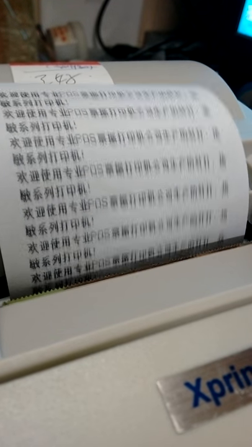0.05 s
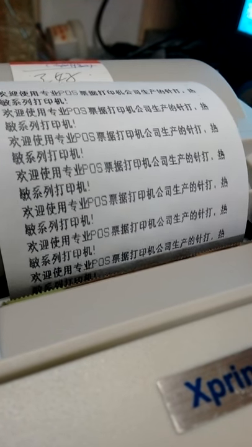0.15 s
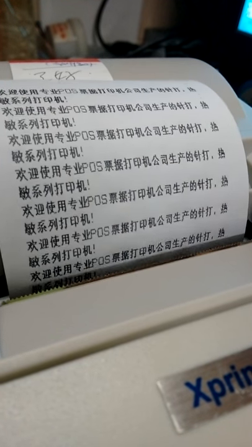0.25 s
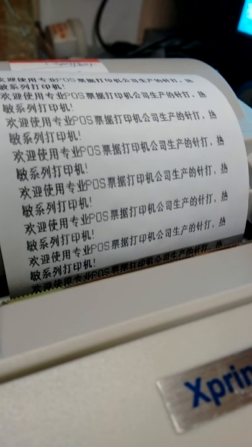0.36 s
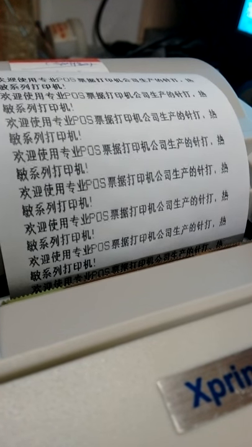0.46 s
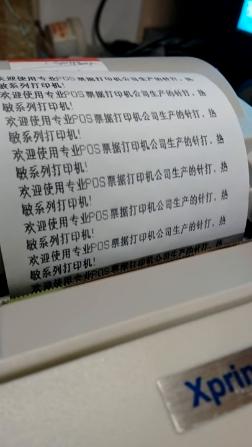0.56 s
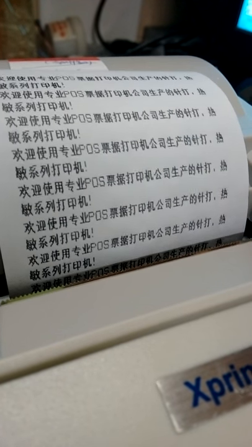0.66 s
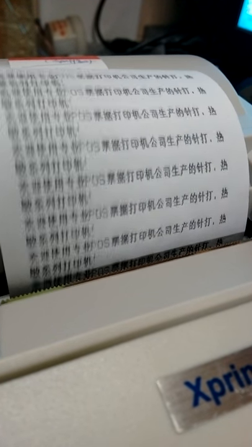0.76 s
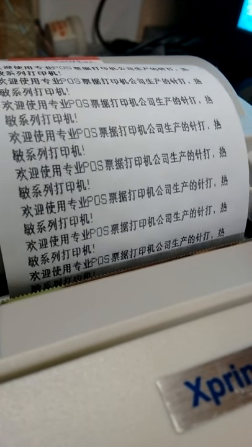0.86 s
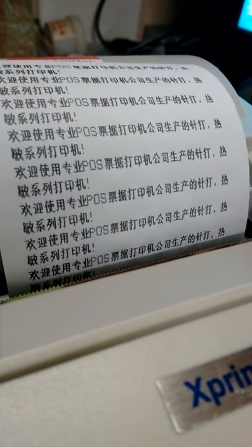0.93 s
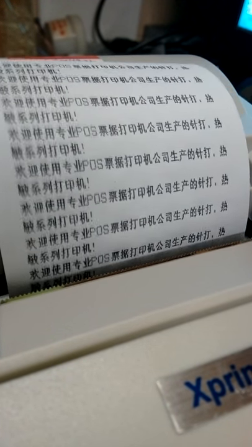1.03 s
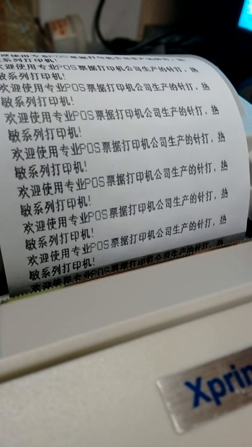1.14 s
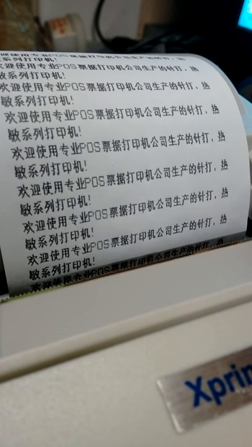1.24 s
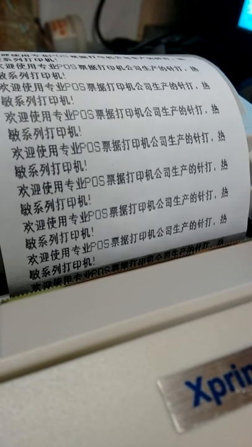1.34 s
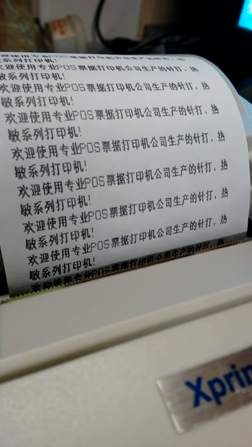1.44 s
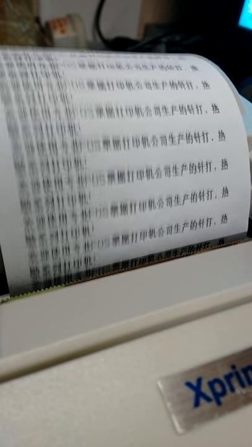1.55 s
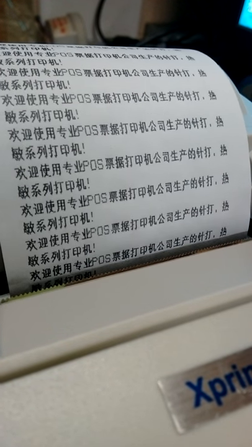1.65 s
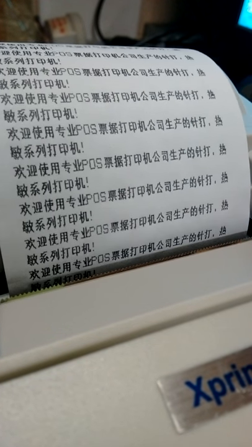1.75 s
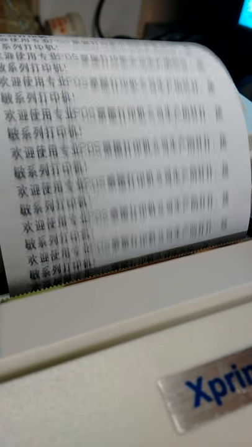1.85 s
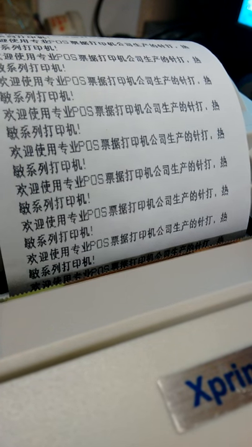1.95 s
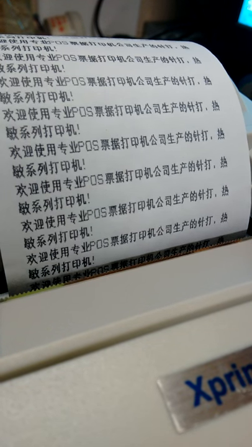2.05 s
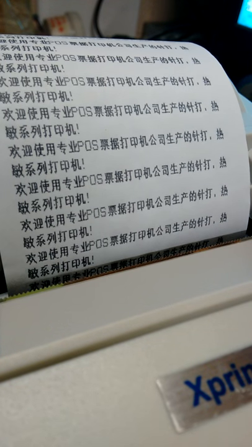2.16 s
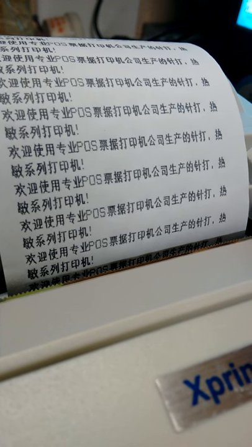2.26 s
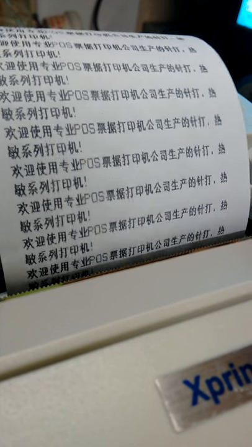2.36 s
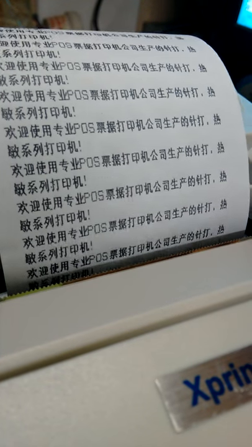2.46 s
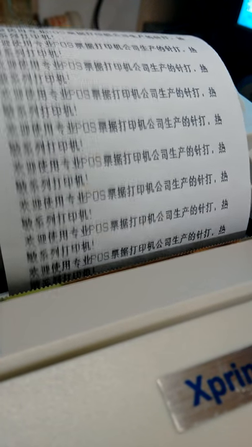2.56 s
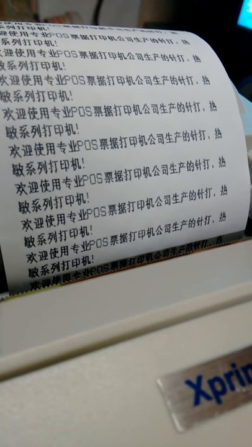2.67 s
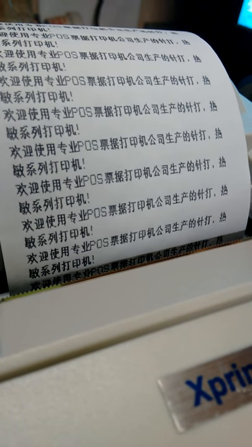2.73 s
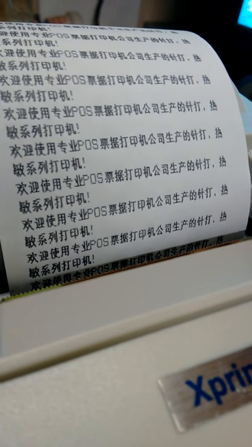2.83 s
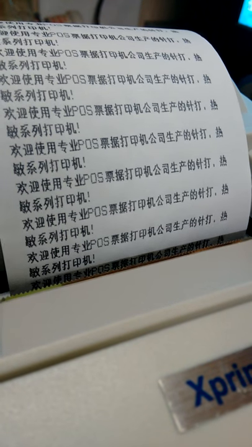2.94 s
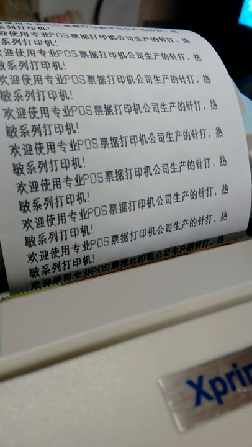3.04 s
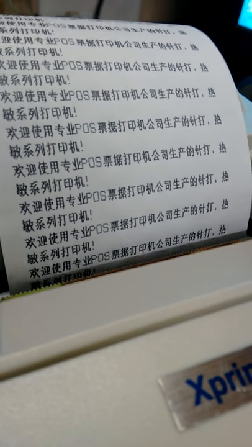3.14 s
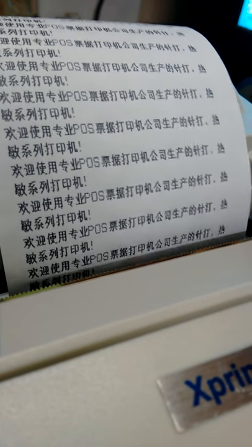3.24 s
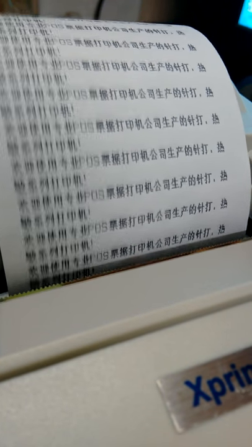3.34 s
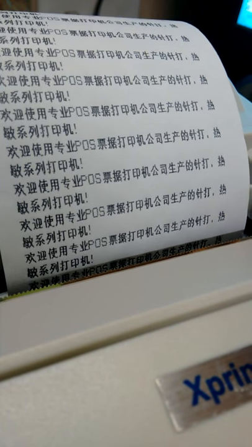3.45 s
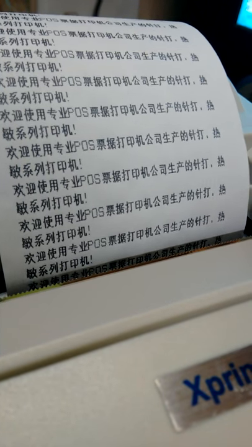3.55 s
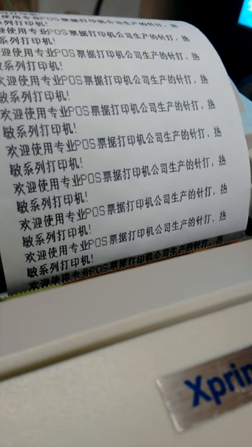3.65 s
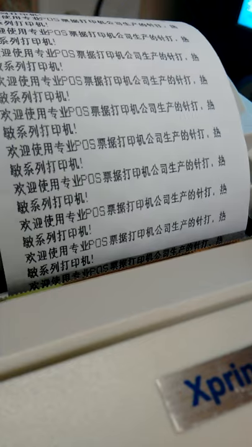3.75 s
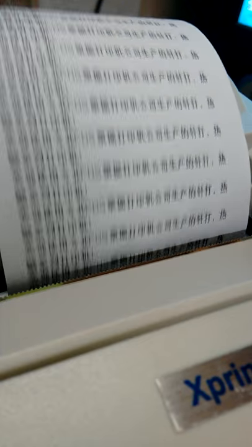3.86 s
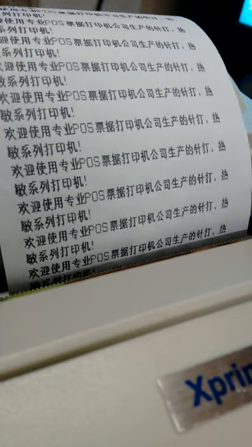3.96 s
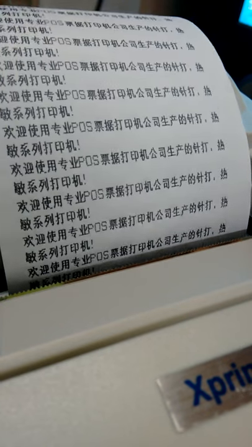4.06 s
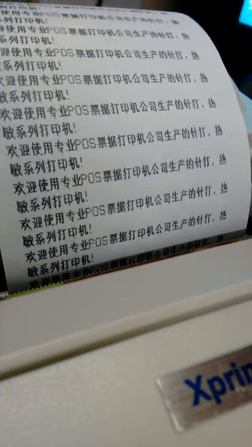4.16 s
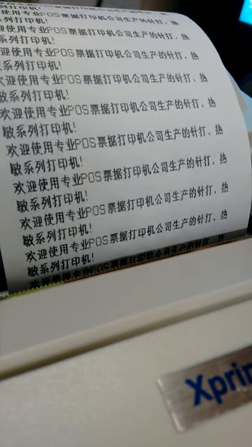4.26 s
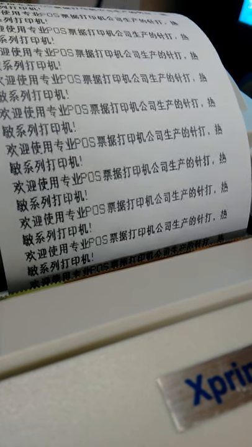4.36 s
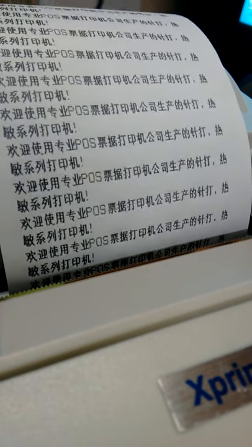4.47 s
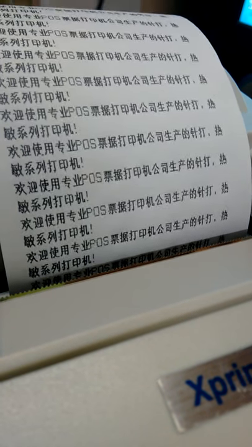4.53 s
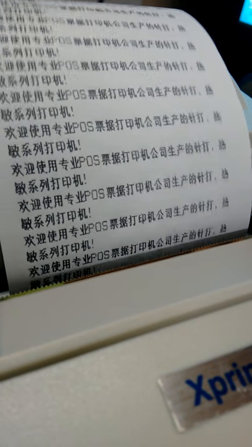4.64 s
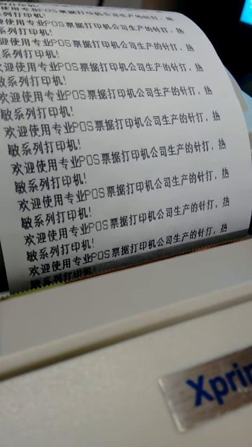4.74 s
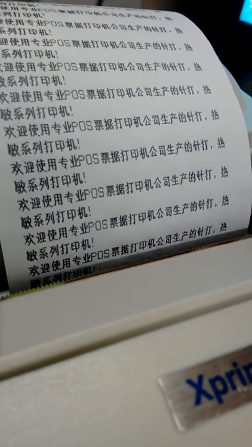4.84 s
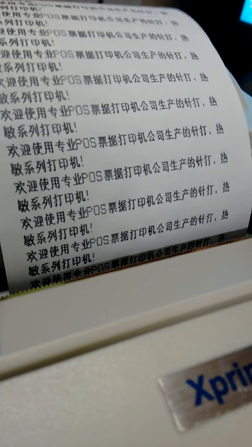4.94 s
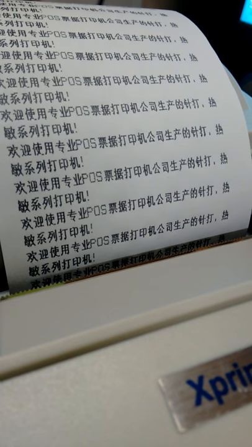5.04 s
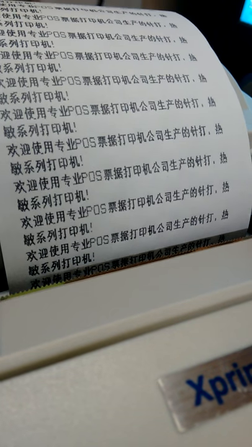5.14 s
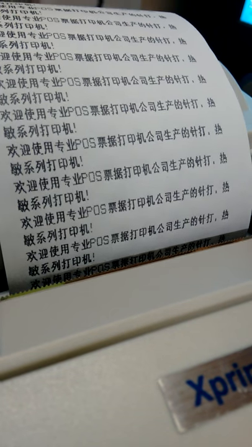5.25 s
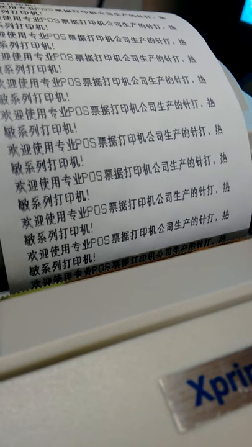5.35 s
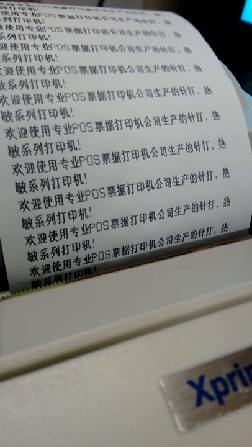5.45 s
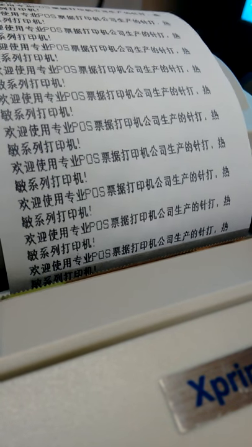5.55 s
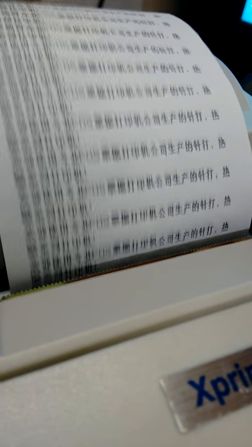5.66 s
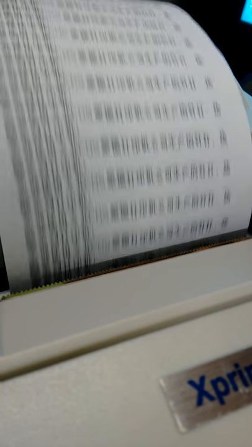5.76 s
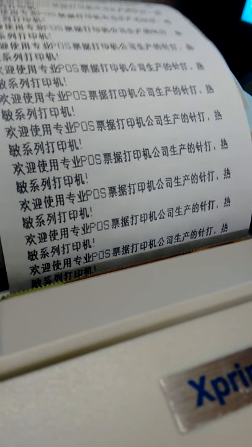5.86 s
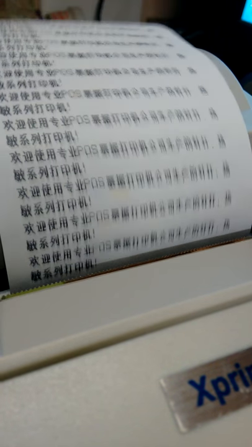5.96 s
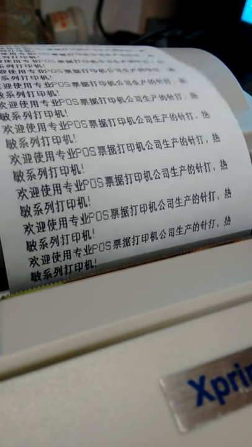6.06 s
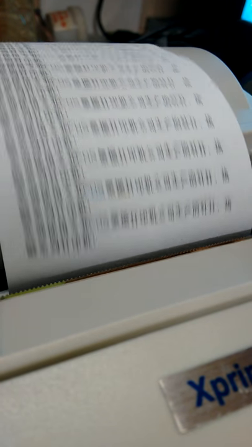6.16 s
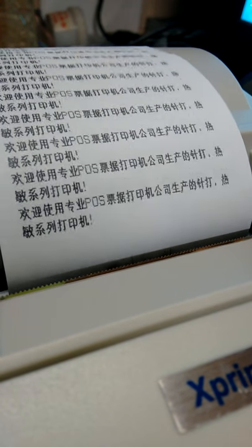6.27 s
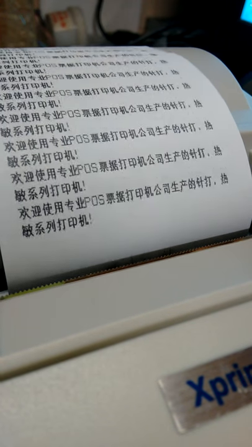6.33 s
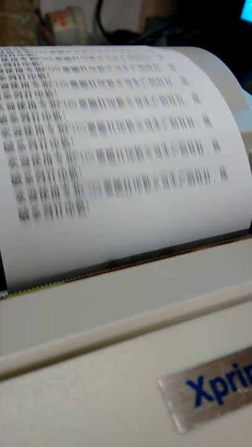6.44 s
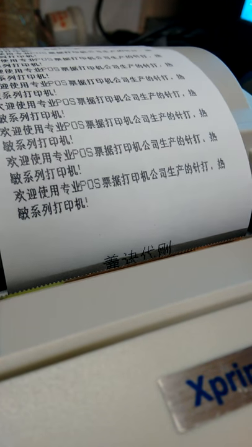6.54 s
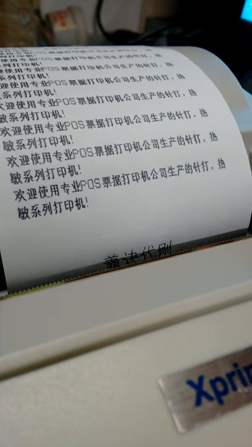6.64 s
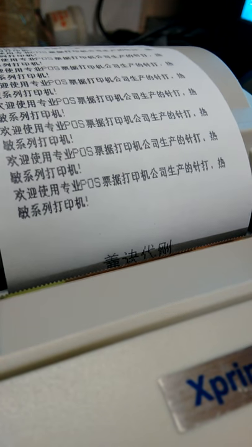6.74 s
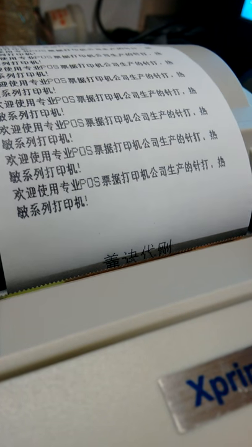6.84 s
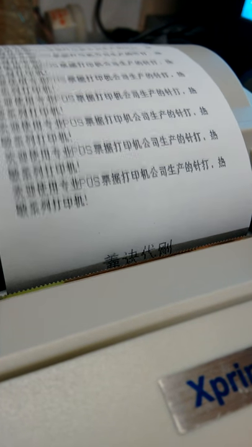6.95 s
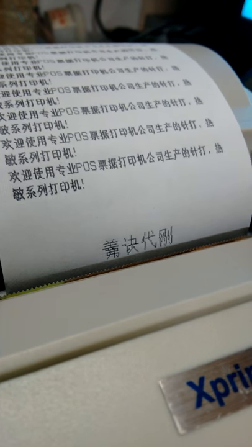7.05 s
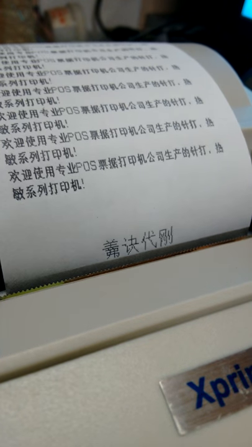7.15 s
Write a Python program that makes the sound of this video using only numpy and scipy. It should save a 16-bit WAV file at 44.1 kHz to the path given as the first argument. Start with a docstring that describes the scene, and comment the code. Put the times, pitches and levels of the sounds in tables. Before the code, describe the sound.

A small impact printer buzzes and zips rapidly line after line, clattering as its carriage reverses, then pauses and finishes with sparse short rasps.

```python
"""A dot-matrix receipt printer, very close: it prints the same two lines of text over and over, then a footer.
Eight pins strike on a fixed column clock, two passes a line; their blows ring and add up to clock tones.
Gear teeth jolt case and loose parts as paper and carriage move, stepper motors sing at their step rate,
and the running mechanism chatters. The pins are louder on the right; the input stage flattens the peaks."""
import sys
import numpy as np
from scipy import signal
from scipy.fft import rfft, irfft, next_fast_len
from scipy.io import wavfile
from scipy.ndimage import uniform_filter1d

SR = 44100
rng = np.random.default_rng(int(sys.argv[2]) if len(sys.argv) > 2 else 0)


def log_audio(samples):
    """Write samples as a 16-bit WAV file to the path given in sys.argv[1]."""
    # one column per channel
    frames = np.atleast_2d(samples).T
    # limit to full scale, then quantise
    limited = np.clip(frames, -1, 1)
    pcm = np.round(limited * 32767).astype(np.int16)
    wavfile.write(sys.argv[1], SR, pcm)


N = 317500
FREQ = np.fft.rfftfreq(next_fast_len(N + SR // 2), 1 / SR)
TIME = np.arange(N) / SR

COLUMN_HZ = 2368.6
LAG_S = .00027  # the left microphone hears later
BRAKE_AFTER_S, RUN_UP_S = .014, .021  # carriage brakes after the last dot, sets off before the next

# starts of the repeats of the two text lines: time [s]
REPEAT_STARTS = [-.2377, .526, 1.2897, 2.0533, 2.817, 3.5806, 4.3443, 5.1079]
# print runs in one repeat: (start [s], end [s], head place at start [0-1], direction [+1/-1],
# columns per dot, level [dB])
TEXT_RUNS = [(0, .0455, 0, 1, 1, -.5), (.0603, .153, .36, 1, 1, 1), (.159, .1662, .95, 1, 1, -1),
             (.2298, .2372, 1, -1, 1, 1), (.244, .396, .91, -1, 1, 0), (.4855, .531, 0, 1, 1, 0),
             (.6022, .649, .27, -1, 1, -.5)]
# print runs in the footer, same columns
FOOTER_RUNS = [(6.0407, 6.101, 0.2, 1, 2, 1), (6.188, 6.246, 0.62, -1, 2, .5),
               (6.435, 6.46, 0.28, 1, 1, 0.5), (6.534, 6.568, 0.3, -1, 1, 0),
               (6.78, 6.784, 0.11, 1, 1, -10), (6.795, 6.8, 0.26, 1, 1, -1.5),
               (6.809, 6.826, 0.25, 1, 1, -2), (7.022, 7.064, 0.33, -1, 1, -1),
               (7.071, 7.076, 0.11, -1, 1, -6), (7.087, 7.092, .06, -1, 1, -6)]
# carriage travel without printing: (start [s], end [s], level [dB])
CARRIAGE_TRAVELS = [(5.968, 6.007, -6.5), (6.641, 6.69, -6), (6.694, 6.793, -1.5), (6.863, 6.987, -1.5)]
# print head balance: (frequency [Hz], left minus right [dB])
HEAD_BALANCE = [(100, -13), (1000, -5), (2700, -4), (3800, -6.5), (5300, -11), (6000, -1), (7200, -16.5),
                (8400, -19.5), (9600, -24), (11000, -5), (12500, -2), (15000, -3.5)]
# drive balance, same columns
DRIVE_BALANCE = [(60, -5.5), (150, 3.5), (380, -1), (950, -2), (2380, -2.5), (5980, -10.5), (15000, 4)]


def amp(db):
    """Decibels to gain."""
    return 10 ** (np.asarray(db) / 20)


def unit(x):
    """Scale to rms 1."""
    return x / np.sqrt(np.mean(x ** 2) + 1e-20)


def along(points, hz):
    """(Hz, value) points read on a log axis."""
    f, v = np.transpose(points)
    return np.interp(np.log(hz + 1), np.log(f + 1), v)


def filtered(x, response):
    """x times a response given on FREQ."""
    size = next_fast_len(N + SR // 2)
    return irfft(rfft(x, size) * response, size)[..., :N]


def resonances(modes):
    """Causal response of (Hz, width Hz, dB) modes."""
    return sum(amp(db) * 1j * FREQ * w / (hz * hz - FREQ ** 2 + 1j * FREQ * w) for hz, w, db in modes)


def ring(shape, t60, tail_db, tail_t60):
    """Dense modes after a blow: a quick decay and a weaker, longer one from the housing (t60s in s)."""
    t = TIME[:SR // 12]
    decay = amp(-60 * t / t60) + amp(tail_db - 60 * t / tail_t60)
    return rng.standard_normal((*shape, len(t))) * decay


def add(track, s, sound):
    """Mix a sound into a track at s seconds."""
    i = int(round(s * SR))
    a, b = max(i, 0), min(i + sound.shape[-1], N)
    if b > a:
        track[..., a:b] += sound[..., a - i:b - i]


def at_ears(pair, spectrum, side, lag_s):
    """Colour two unrelated signals causally and share them between the microphones; the left hears later."""
    # (frequency [Hz], share common to both microphones [0-1])
    common_share = [(40, 0.8), (250, 0.99), (800, 1), (2000, 0.11), (6000, 0.06), (14000, 0.057)]
    size = next_fast_len(N + SR // 2)
    lean = amp(along(side, FREQ))
    gain = amp(along(spectrum, FREQ)) * np.array([lean, np.ones_like(lean)])
    # folded cepstrum: minimum phase
    cepstrum = irfft(np.log(gain), size)
    cepstrum[:, 1:size // 2] *= 2
    cepstrum[:, size // 2 + 1:] = 0
    own, common = rfft(pair, size)
    share = np.clip(along(common_share, FREQ), 0, 1)
    left = share * common + np.sqrt(1 - share ** 2) * own
    left = left * np.exp(-2j * np.pi * FREQ * lag_s)
    return unit(irfft(np.array([left, common]) * np.exp(rfft(cepstrum)), size)[:, :N])


def print_head(pin_db=-10.5, housing_db=-24, tone_db=0, force_db=3.0, scatter_s=.000008, places=5):
    """Pins strike on the column clock; each rings in its own way, which shifts as the head travels."""
    # pin strike spectrum: (frequency [Hz], level [dB per Hz])
    pin_spectrum = [(85, -53), (135, -22.5), (190, -35), (330, -28.5), (750, -37.5), (1000, -16.5),
                    (1300, -24), (1600, -24), (2700, -22.5), (4100, -19), (6300, -13), (8000, 2.5),
                    (9100, 2.5), (10600, -9.5), (15000, -14)]
    # platen and housing resonances: (frequency [Hz], width [Hz], level [dB])
    housing_modes = [(1002, 83, -3.5), (1271, 121, 0.5), (1785, 250, -10.5), (2022, 98, -5),
                     (2544, 250, -3.5), (3303, 34, -1.5), (4180, 140, -16), (5120, 187, -5), (6544, 37, 6)]
    housing_drive = [(600, -16.5), (900, -2.5), (6500, 1), (8000, -26.0)]  # (Hz, dB per Hz)
    crossing_s = .167  # head crosses the paper
    size = next_fast_len(SR // 5)
    paths = rfft(ring((2, places, 8), t60=0.0058, tail_db=-14, tail_t60=0.065), size)
    page = [dots(run) for run in TEXT_RUNS]  # the same characters come back in every repeat
    runs = [(s, run, pattern) for s in REPEAT_STARTS for run, pattern in zip(TEXT_RUNS, page)]
    runs += [(0, run, dots(run)) for run in FOOTER_RUNS]
    strikes, tones = np.zeros((2, N)), np.zeros((2, N))
    for s, (start, end, place, direction, stride, db), (pin, when) in runs:
        struck_s = np.abs(when + scatter_s * rng.standard_normal(len(pin)))
        blows = np.zeros((8, size))
        blows[pin, np.round(struck_s * SR).astype(int)] = amp(db + force_db * rng.standard_normal(len(pin)))
        head = np.clip(place + np.sign(direction) * TIME[:size] / crossing_s, 0, 1)
        # crossfade between the ring paths of neighbouring head places
        distance = np.abs(head * (places - 1) - np.arange(places)[:, None])
        nearness = np.sqrt(np.maximum(0, 1 - distance))
        placed_blows = rfft(nearness[:, None] * blows)
        add(strikes, s + start, irfft(np.einsum('spf,cspf->cf', placed_blows, paths), size))
        add(tones, s + start, clock_tones(blows, head, stride, s + start))
    direct = at_ears(strikes, pin_spectrum, HEAD_BALANCE, LAG_S)
    driven = at_ears(strikes[::-1], housing_drive, HEAD_BALANCE, lag_s=0.00018)
    housing = unit(filtered(driven, resonances(housing_modes)))
    return amp(pin_db) * direct + amp(housing_db) * housing + amp(tone_db) * tones


def dots(run, ink=.42, stroke_db=4.5, flight_s=.00013, cell=18, width=16):
    """Pins and strike times [s]: characters 16 columns wide in cells of 18; pins fly a little early or late."""
    start, end, _, _, stride, _ = run
    column = np.arange(max(1, int((end - start) * COLUMN_HZ)))
    stride = max(1, round(stride))
    boldness_db = 2.5 * rng.standard_normal(len(column))[column // cell]  # per character
    # upright strokes fire many pins
    chance = ink * stride * amp(boldness_db + stroke_db * rng.standard_normal(len(column)))
    chance[:6] = .7 * stride  # a run opens with a bold stroke
    inked = (column % cell < width) * (column % stride == 0)
    pin, column = np.nonzero((rng.random((8, len(column))) < chance) * inked)
    return pin, column / COLUMN_HZ + flight_s * rng.standard_normal(len(pin))


def clock_tones(blows, head, stride, s, rough_rad=0.15, vary_db=1.5):
    """What the dots share adds up to tones, which swell with dots per column and flutter with the strokes."""
    # dots in every other column: (frequency [Hz], level [dB])
    half_tones = [(1184, -25), (2369, -33), (3553, -39), (7106, -22), (8290, -16.5), (9474, -15.5),
                  (11843, -35)]
    # housing hum at the character rate and twice that: (frequency [Hz], level [dB])
    character_hum = [(131.6, -48), (263.2, -43.5)]
    t = TIME[:len(head)]
    keep = np.exp(-1 / (.0013 * SR))  # 1.3 ms smoothing
    busy = signal.lfilter([1 - keep], [1, -keep], blows.mean(0)) * SR / COLUMN_HZ * 5.38
    lines = half_tones if round(stride) == 2 else clock_lines(head, s)
    tones = np.zeros((2, len(t)))
    for hz, db in lines + character_hum:
        flutter = rough_rad * unit(uniform_filter1d(rng.standard_normal(len(t)), SR // 250))
        phase = 2 * np.pi * (hz * (t - np.array([[LAG_S], [0]])) + rng.random()) + flutter
        balance = amp([[along(HEAD_BALANCE, hz)], [0]])
        tones += balance * amp(db + vary_db * rng.standard_normal()) * np.sin(phase)
    return busy * tones


def clock_lines(head, s):
    """(Hz, dB) of each multiple of the column clock as the head travels, in a run that starts at s."""
    # column clock tones: (multiple, level before whine and swells [dB])
    base_levels = [(1, -33), (2, -34.5), (3, -23.5), (4, -25.5), (5, -34), (6, -47)]
    # swells along the carriage: (multiple, head place [0-1], half width [0-1], rise [dB])
    place_swells = [(1, 0.7, 0.31, 11.5), (4, .5, 0.24, 12)]
    whine_start_db, whine_rise_s = -10, 0.47  # the lowest tone starts weak and comes forward
    levels = {round(k): db for k, db in base_levels}
    levels[1] += whine_start_db * np.exp(-max(s, 0) / whine_rise_s)
    for k, place, width, rise_db in place_swells:
        levels[round(k)] += rise_db * np.exp(-np.square((head - place) / width) ** 2)
    return [(k * COLUMN_HZ, db) for k, db in levels.items()]


def gears(thud_db=-31, rattle_db=-31, tooth_hz=255, spring_db=-39, push=10):
    """Each start or stop is a short train of tooth impacts: the case thuds, loose parts rattle and ring on."""
    # case under a jolt: (frequency [Hz], level [dB per Hz])
    case_spectrum = [(40, -26), (150, -15), (260, 3), (450, 5.5), (580, -7), (800, 8), (1050, -9),
                     (1650, -4), (2500, 7.5), (3800, -13), (5000, -7.5), (9000, -6.5), (15000, -11.5)]
    # loose parts, same columns
    rattle_spectrum = [(300, -25), (1300, 13.5), (1900, -27), (4000, 0), (6000, 3.5), (8200, 21.5),
                       (10500, 3), (15000, 4)]
    # thin metal parts: (frequency [Hz], width [Hz], level [dB])
    spring_modes = [(6780, 22, 10), (2760, 230, 12), (4905, 51, 12.5), (9400, 23, -11)]
    thuds, rattles = np.zeros((2, N)), np.zeros((2, N))
    for s, length, thud, rattle in jolts():
        for at in np.arange(0, length, 1 / tooth_hz):
            force_db, play_db, slip_s = rng.standard_normal(3) * [1, 1.5, .0003]
            blow = ring((2,), t60=.011, tail_db=-16, tail_t60=.08)
            blow[:, 0] += push  # the tooth's own push, ahead of the clatter
            clatter = ring((2,), t60=0.023, tail_db=-31, tail_t60=0.037)
            add(thuds, s + at + slip_s, amp(thud + force_db) * blow)
            add(rattles, s + at + 2 * slip_s, amp(rattle + play_db) * clatter)
    case = at_ears(thuds, case_spectrum, DRIVE_BALANCE, lag_s=0.00021)
    loose = at_ears(rattles, rattle_spectrum, DRIVE_BALANCE, LAG_S)
    springs = unit(filtered(loose, resonances(spring_modes)))
    return amp(thud_db) * case + amp(rattle_db) * loose + amp(spring_db) * springs


def jolts():
    """Jolts of paper and carriage, hard on reversing, soft on setting off: (s, length s, thud dB, rattle dB)."""
    # loose parts tick on the way: (time [s], rattle level [dB])
    rattle_ticks = [(6.894, -3.5), (6.946, -6)]
    # jolt per kind of move: (length [s], case thud [dB], rattle [dB])
    feed_start = (.019, 1, -13.5)
    feed_stop = (.007, 0.59, -13)
    brake = (.006, 0.62, -1)
    reverse = (.015, -0.65, -4.5)
    set_off = (.006, -8, -10.5)
    travel_start = (.007, 1, -4.5)
    tick_thud_db = -3.5
    moves = [(s, travel_start, db) for s, _, db in CARRIAGE_TRAVELS]
    for start, stop, db in feeds():
        moves += [(start, feed_start, db), (stop, feed_stop, db)]
    for end, start, at_once in turns():
        if at_once:
            moves += [(end + BRAKE_AFTER_S, brake, 0), (start - RUN_UP_S, reverse, 0)]
        else:
            moves += [(start - RUN_UP_S, set_off, 0)]
    ticks = [(s, brake[0], tick_thud_db, db) for s, db in rattle_ticks]
    return [(s, length, thud + db, rattle + db) for s, (length, thud, rattle), db in moves] + ticks


def feeds():
    """Every paper feed: (start s, stop s, level dB)."""
    # feeds in one repeat: (start [s], length [s], level [dB])
    line_feeds = [(0.413, .037, -1), (0.689, .037, -1.5)]
    # feeds around the footer, same columns
    footer_feeds = [(5.853, 0.096, 1), (6.113, .034, 0.5), (6.264, 0.036, 0), (6.317, 0.068, 0),
                    (6.586, .035, 1), (7.11, 0.043, 0)]
    rows = [(s + at, length, db) for s in REPEAT_STARTS for at, length, db in line_feeds] + footer_feeds
    return [(s, s + length, db) for s, length, db in rows]


def turns(turn_gap_s=.03):
    """Longer gaps between runs: (last dot s, next dot s, whether no feed or travel starts between)."""
    runs = [(s + start, s + end) for s in REPEAT_STARTS for start, end, *_ in TEXT_RUNS]
    runs += [run[:2] for run in FOOTER_RUNS]
    others = [move[0] for move in feeds() + CARRIAGE_TRAVELS]
    return [(end, start, not any(end < s < start for s in others))
            for (_, end), (start, _) in zip(runs, runs[1:]) if start - end > turn_gap_s]


def motors(motor_db=0, fade_s=0.0088, waver=.005):
    """The steppers sing at their step rate, which wavers slightly (rms share of the rate)."""
    song = np.zeros(N)
    for start, end, first_hz, last_hz, db in steps():
        t = TIME[:max(2, int((end - start) * SR))]
        drift = waver * unit(uniform_filter1d(rng.standard_normal(len(t)), SR // 200))
        hz = np.linspace(first_hz, last_hz, len(t)) * (1 + drift)
        swell = np.clip(np.minimum(t, t[-1] - t) / fade_s, 0, 1)
        tone = np.sin(2 * np.pi * (np.cumsum(hz) / SR + rng.random()))
        add(song, start, np.sqrt(2) * amp(db) * swell * tone)
    return amp(motor_db) * song


def steps():
    """Feed motor starts slowly, runs, ramps down; carriage motor sings in turns and travel: (s, s, Hz, Hz, dB)."""
    start_hz, run_hz, stop_hz = 249, 785, 376  # feed motor
    start_db, run_db, stop_db = -32.5, -36, -34
    slow_s, half_brake_s = .024, .011  # slow first steps; half the braking ramp
    carriage_hz, sag_hz = 360.5, 24.5  # step rate, and its fall while braking
    turn_db, braking_db, run_up_db, travel_db = -38, -40, -43.5, -38
    settle_s = .03  # the song lasts this long into a pass
    moves = [(start, end, carriage_hz, carriage_hz, travel_db + db) for start, end, db in CARRIAGE_TRAVELS]
    for start, stop, db in feeds():
        moves += [(start, start + slow_s, start_hz, start_hz, start_db + db),
                  (start + slow_s - half_brake_s / 2, stop, run_hz, run_hz, run_db + db),
                  (stop - half_brake_s, stop + half_brake_s, run_hz, stop_hz, stop_db + db)]
    for end, start, at_once in turns():
        if at_once:
            moves += [(end, start + settle_s, carriage_hz, carriage_hz, turn_db)]
        else:
            braked = end + BRAKE_AFTER_S + settle_s
            moves += [(end, braked, carriage_hz, carriage_hz - sag_hz, braking_db),
                      (start - RUN_UP_S, start + settle_s, carriage_hz, carriage_hz, run_up_db)]
    return moves


def whirr(grain_db=1.5, whirr_db=-32, slide_db=-33):
    """Belt, ribbon and gears chatter finely and unevenly; the carriage hisses along its rail unless it rests."""
    # running mechanism: (frequency [Hz], level [dB per Hz])
    running_spectrum = [(15, -18), (25, -16), (164, -13), (358, -3), (522, -9), (782, -5), (1850, -13.5),
                        (2690, -9), (4370, -11.5), (4870, -11.5), (8570, -13), (13200, -18.5), (15500, -35)]
    # carriage on its rail, same columns
    rail_spectrum = [(1000, -30), (5500, -16), (7200, -6), (9200, 0), (11000, -9), (15000, -14)]
    parked_s, half_length_s, parked_db = 5.92, 0.12, -3  # rest before the footer: middle, half length, dip
    grain = amp(grain_db * unit(uniform_filter1d(rng.standard_normal(N), SR // 300)))
    parked = np.exp(-np.square((TIME - parked_s) / half_length_s) ** 2)
    running = at_ears(grain * rng.standard_normal((2, N)), running_spectrum, DRIVE_BALANCE, lag_s=0.00018)
    sliding = at_ears(grain * rng.standard_normal((2, N)), rail_spectrum, HEAD_BALANCE, LAG_S)
    return amp(whirr_db + parked_db * parked) * running + amp(slide_db) * (1 - parked) * sliding


def scene():
    """Print head, gear train, motors and running noise."""
    return print_head() + gears() + motors() + whirr()


def record(dry, top=0.91, hardness=5, bias=0.056, band_limit_hz=15550):
    """The input stage flattens the peaks, slightly lopsided, ahead of the band limit."""
    ceiling = top - bias * np.sign(dry)
    clipped = dry / (1 + np.abs(dry / ceiling) ** hardness) ** (1 / hardness)
    return filtered(clipped, FREQ < band_limit_hz)


dry = scene()
out = record(dry)
log_audio(out)
```